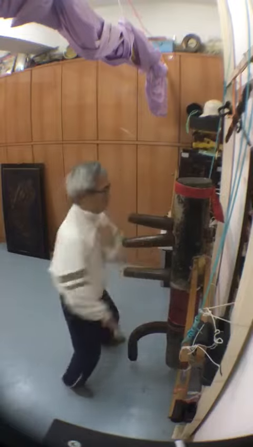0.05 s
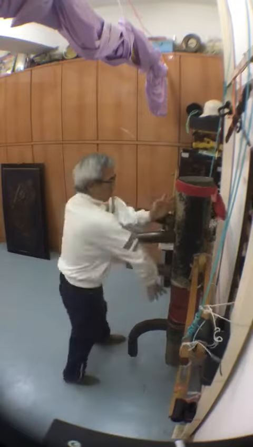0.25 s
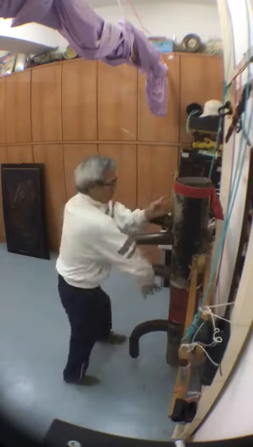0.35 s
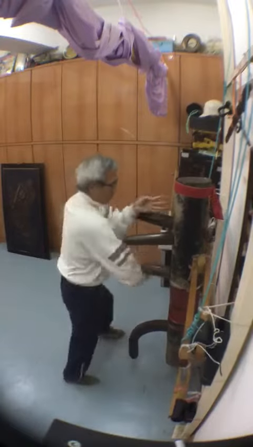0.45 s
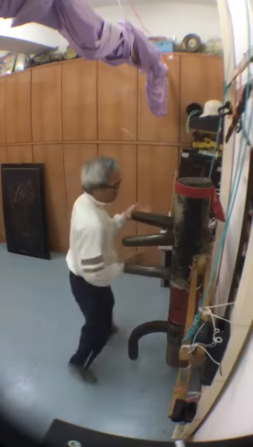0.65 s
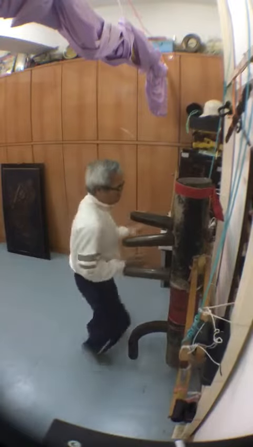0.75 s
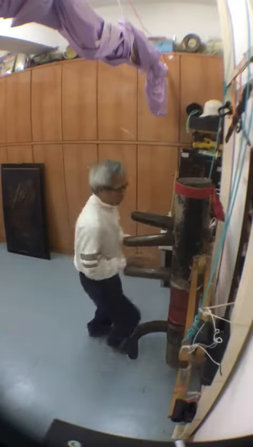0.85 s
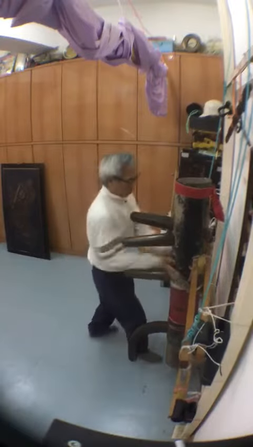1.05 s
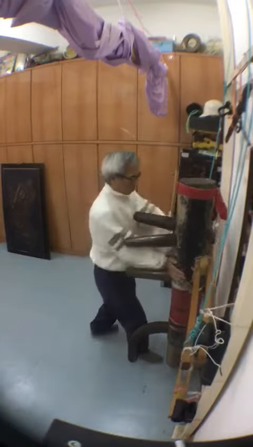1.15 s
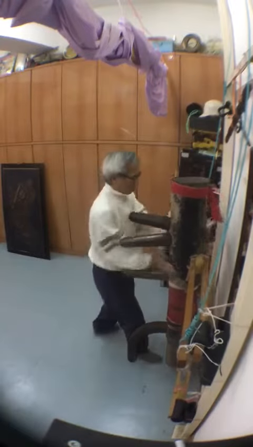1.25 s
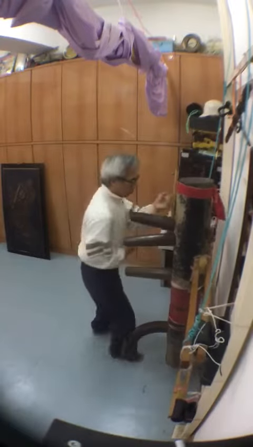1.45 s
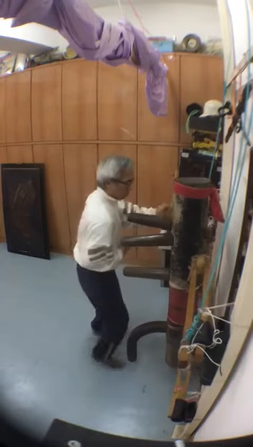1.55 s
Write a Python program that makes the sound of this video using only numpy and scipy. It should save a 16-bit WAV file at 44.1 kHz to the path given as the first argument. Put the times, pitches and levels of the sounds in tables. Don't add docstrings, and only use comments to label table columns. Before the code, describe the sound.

Wooden training dummy hit hard once, then smaller knocks and a loose leg clack, echoing indoors

```python
import sys
import numpy as np
from scipy import signal
from scipy.fft import rfft, irfft, next_fast_len
from scipy.io import wavfile
from scipy.ndimage import map_coordinates

SR = 44100
rng = np.random.default_rng(int(sys.argv[2]) if len(sys.argv) > 2 else 0)


def volts_from_db(level):
    exponent = np.asarray(level, float) / 20
    return 10 ** exponent


def digitize_waveform(pressure):
    field = np.atleast_2d(pressure).T
    bounded = np.clip(field, -1, 1)
    quanta = np.round(bounded * 32767).astype(np.int16)
    wavfile.write(sys.argv[1], SR, quanta)


N = 70560


def unit(x):
    return x / np.sqrt(np.mean(x ** 2) + 1e-20)


def along(points, hz):
    f, v = np.transpose(points)
    return np.interp(np.log(hz + 1), np.log(f + 1), v)


def coloured(x, gain):
    m = 2 * next_fast_len(len(x) // 2 + SR // 4)
    cepstrum = irfft(np.log(gain(np.fft.rfftfreq(m, 1 / SR)) + 1e-6), m)
    cepstrum[1:m // 2] *= 2
    cepstrum[m // 2 + 1:] = 0
    return irfft(rfft(x, m) * np.exp(rfft(cepstrum)), m)[:len(x)]


def bell(hz, centre_hz, width_hz):
    return 1 / np.sqrt(1 + (2 * (hz - centre_hz) / width_hz) ** 2)


def wobble(rate):
    knots = rng.standard_normal(int(N * rate / SR) + 4)
    return map_coordinates(knots, [np.arange(N) * rate / SR])


# frequency in Hz, level in dB.
AIR_TONE = [(59, -76), (100, -27), (189, -8), (438, -11), (1030, -14.5), (1120, -16), (1290, -18.5),
            (5430, -56.5), (11800, -53), (15400, -138), (22000, -120)]
# frequency in Hz, width in Hz, level in dB.
HUM_MODES = [(41.67, 3.3, -47.5), (69.9, 18, -47.5), (90.6, 10, -61.5), (125.8, 11.5, -55.5),
             (187, 60, -58)]
AIR_DB = -52


def air():
    tone = [(60, -14)] + AIR_TONE
    hiss = unit(coloured(rng.standard_normal(N), lambda hz: volts_from_db(along(tone, hz))))
    hum = np.zeros(N)
    for centre_hz, width_hz, db in HUM_MODES:
        mode = coloured(rng.standard_normal(N), lambda hz: bell(hz, centre_hz, width_hz) ** 2)
        hum += volts_from_db(db) * unit(mode)
    return volts_from_db(AIR_DB - 1.5 + 0.4 * wobble(4.9)) * hiss + hum


# time in seconds, level in dB.
SLEEVE_MOVES = [(0, -51), (0.033, -43.5), (0.068, -41.5), (0.129, -47), (.17, -52.5), (0.209, -43),
                (.45, -63.5), (.62, -41.5), (.69, -42.5), (.8, -48.5), (0.858, -52), (0.958, -58),
                (1.028, -47), (1.122, -48), (1.3, -47), (1.38, -45), (1.5, -47), (1.6, -44)]
# frequency in Hz, level in dB.
CLOTH_TONE = [(600, -58), (1500, -7.5), (2300, -7.5), (2900, -7.5), (4000, -7.5), (5400, -0.5), (6800, -12),
              (8000, -25)]
CLOTH_DB, RUBS_PER_S, RUB_SHARE = -2, 900, .3


def sleeves():
    s, db = np.transpose(SLEEVE_MOVES)
    rubs = (rng.random(N) < RUBS_PER_S / SR) * rng.standard_normal(N)
    friction = rng.standard_normal(N) + RUB_SHARE * unit(rubs)
    tone = CLOTH_TONE + [(12000, -33)]
    hiss = unit(coloured(friction, lambda hz: volts_from_db(along(tone, hz))))
    movement_db = np.interp(np.arange(N) / SR, s, db)
    return hiss * volts_from_db(CLOTH_DB + movement_db + wobble(17))


# start in seconds, level in dB, rise in seconds, 60 dB decay in seconds.
FOOTFALLS = [(0, -44, 0.011, 0.53), (0.058, -30.5, 0.013, 0.19), (.3, -44.5, .03, 1),
             (0.498, -41.5, 0.033, .5), (.68, -28.5, .015, 0.44), (0.726, -32, 0.01, 0.11),
             (1.162, -36, 0.01, 0.21), (1.258, -41.5, .02, .25), (1.389, -45.5, 0.01, .25)]
# frequency in Hz, level in dB.
FLOOR_BOARDS = [(68, -1), (91, 7.5), (185, -12.5)]


def steps():
    out, t = np.zeros(N + SR), np.arange(SR) / SR
    boom = sum(volts_from_db(level) * np.sin(2 * np.pi * hz * t) for hz, level in FLOOR_BOARDS)
    for s, db, rise, t60 in FOOTFALLS:
        swell = 1 - np.exp(-(t / rise) ** 2)
        out[round(s * SR):][:SR] += volts_from_db(db - 60 * t / t60) * swell * boom
    return out[:N]


# delay in seconds, level in dB.
WALL_ECHOES = [(.0035, -14), (.0078, -1.5), (.0128, -2.5), (.017, -11), (.022, -6), (.029, -9)]
# frequency in Hz, 60 dB decay in seconds.
ROOM_DECAY = [(150, 0.95), (300, 0.69), (1000, 0.96), (2500, 0.91), (5500, 0.76), (10000, 0.98)]
BUILD_S, EARLY_DB, EARLY_T60_S = .017, 4, .25


def room(x, wet_db):
    hz, t, z = signal.stft(rng.standard_normal(SR * 9 // 8), SR, nperseg=256)
    decay = volts_from_db(-60 * t / along(ROOM_DECAY, hz)[:, None])
    tail = signal.istft(z * decay, SR, nperseg=256)[1]
    t = np.arange(len(tail)) / SR
    build = 1 - np.exp(-(t / BUILD_S) ** 2)
    early = 1 + volts_from_db(EARLY_DB - 60 * t / EARLY_T60_S)
    tail = tail * build * early
    answer = volts_from_db(wet_db) * tail / np.linalg.norm(tail)
    answer[0] += 1
    for s, db in WALL_ECHOES:
        answer[round(s * SR)] += volts_from_db(db)
    return signal.fftconvolve(x, answer)


SLAP_DB, MODE_RISE_S = 18, 0.0012


def ringing(modes, t):
    ring = np.zeros(len(t))
    for f, level, t60 in modes:
        level_shift = 1.5 * rng.standard_normal()
        detune = .01 * rng.standard_normal()
        ring += volts_from_db(level + level_shift - 60 * t / t60) * np.sin(2 * np.pi * f * (1 + detune) * t)
    return ring * (1 - np.exp(-t / MODE_RISE_S)) / 2


def contact_slap(skin, smear_ms, t):
    hz = np.fft.rfftfreq(len(t), 1 / SR)
    late_s = smear_ms / 1000 * np.interp(hz, np.linspace(0, SR / 2, 60), rng.random(60))
    phase = 2 * np.pi * np.cumsum(late_s) * hz[1]
    click = irfft(np.exp(-1j * phase), len(t)) * (t < .05)
    return coloured(click, lambda f: volts_from_db(along(skin, f)))


def knocks(hits, modes, skin, smear_ms, wet_db):
    out, t = np.zeros(N + 3 * SR), np.arange(SR // 4) / SR
    for s, db, hard in hits:
        ring = ringing(modes, t)
        slap = contact_slap(skin, smear_ms, t)
        hard = np.clip(hard, 0, 1)
        knock = (1 - hard) * ring + hard * volts_from_db(SLAP_DB) * slap
        wet = room(volts_from_db(db) * knock, wet_db)
        out[round(s * SR):][:len(wet)] += wet
    return out[:N]


# start in seconds, level in dB, hardness from 0 to 1.
SHOE_KNOCKS = [
    (.655, -38.5, 0.13),
    (.75, -45, .05),
]
# frequency in Hz, level in dB, 60 dB decay in seconds.
SOLE_MODES = [(231, 5, 0.027), (325, 3, 0.023), (466, 0, 0.021), (690, 1.5, 0.022)]


def shoes():
    return knocks(SHOE_KNOCKS, SOLE_MODES, SOCKET_TONE, smear_ms=6, wet_db=7)


# start in seconds, level in dB, hardness from 0 to 1.
LEG_CLACKS = [
    (1.3965, -51, 0.2),
    (1.4075, -25, 0.62),
    (1.428, -32.5, .1),
    (1.454, -48, 0.75),
]
LEG_REBOUNDS = [
    (1.463, -32.5, 0.079),
    (1.4766, -35.5, 0.15),
    (1.51, -40, 0.12),
]
# frequency in Hz, level in dB, 60 dB decay in seconds.
LEG_MODES = [(280, -10, 0.043), (425, -11.5, 0.034), (738, 7.5, 0.01), (893.6, 3.5, 0.062),
             (1949, -4, 0.065), (2206, 2, 0.042), (2430, -7, 0.037), (3050, 0.5, 0.014), (3400, -9, .02),
             (4500, -26, 0.0047)]
REBOUND_MODES = [(504, -4.5, 0.022), (867, -9, 0.052), (1017, -0.5, 0.034), (1920, -5, 0.057),
                 (2154, -9.5, 0.06), (2430, -6, 0.026)]
# frequency in Hz, level in dB.
SOCKET_TONE = [(200, -9), (600, 2.5), (2000, -5.5), (4000, -2.5), (5000, -0.5), (6000, -20), (8000, -17),
               (12000, -10)]


def leg():
    clacks = knocks(LEG_CLACKS, LEG_MODES, SOCKET_TONE, smear_ms=1.8, wet_db=1)
    rebounds = knocks(LEG_REBOUNDS, REBOUND_MODES, SOCKET_TONE, smear_ms=1.8, wet_db=1)
    return clacks + rebounds


# start in seconds, level in dB, hardness from 0 to 1.
ARM_KNOCKS = [(.039, -49, 0.33), (.044, -51, 0.67), (.058, -59.5, 0.46), (.61, -73, 0.8), (.665, -40, 0.59),
              (.814, -60, 0.23), (.871, -56, 1), (1.1235, -62.5, .6), (1.128, -38, 0.71), (1.136, -25, 0.6),
              (1.169, -38.5, 0.058), (1.2192, -39, 0.052)]
# frequency in Hz, level in dB, 60 dB decay in seconds.
ARM_MODES = [(191, -2, 0.069), (283, 0, 0.048), (603, 3, 0.041), (739.4, 14, 0.015), (906, 10, 0.019),
             (1010, 3.5, 0.022), (1256, -1, .03), (1590, -3.5, 0.025), (2290, -10.5, 0.056)]
# frequency in Hz, level in dB.
FOREARM_TONE = [(200, -17), (600, -24), (2000, 0.5), (4000, 3), (5200, 6), (6500, -4.5), (9000, -1),
                (12000, 1.5)]


def arm():
    return knocks(ARM_KNOCKS, ARM_MODES, FOREARM_TONE, smear_ms=2.2, wet_db=3.5)


# start in seconds, level in dB, hardness from 0 to 1.
TRUNK_BLOWS = [
    (.217, -45, 0.06),
    (.2275, -23, 0.18),
    (.236, -9, 0.52),
    (.248, -21.5, 0.96),
    (.33, -25, .3),
]
# frequency in Hz, level in dB, 60 dB decay in seconds.
TRUNK_MODES = [(247, -10, 0.056), (282.4, -9.5, 0.084), (426.5, -19.5, 0.069), (607, 1, 0.02),
               (723, 13, 0.017), (821.5, 2.5, 0.027), (1134, 0, .025), (1252, 13, 0.013), (1453, 8, 0.015),
               (1640, -1, 0.023), (1957, 2, 0.018), (2414, -10.5, 0.033), (3500, -31, .008)]
# frequency in Hz, level in dB.
PALM_TONE = [(200, -16), (600, 12), (2000, -1), (4400, -3), (5450, -1), (6200, -7.5), (7000, -1.5),
             (8200, -11)]


def trunk():
    return knocks(TRUNK_BLOWS, TRUNK_MODES, PALM_TONE, smear_ms=6, wet_db=7)


# frequency in Hz, level in dB.
MIC_TONE = [(30, -15), (45, 11.5), (6900, 11), (7800, 1.5), (10000, -6.5), (11900, -26)]


def mic(hz):
    peak = 1 + 1.1 * bell(hz, 5400, 550) ** 2
    dip = np.abs(1 - .45 * bell(hz, 2850, 500) ** 2)
    return volts_from_db(along(MIC_TONE, hz)) * peak * dip


def scene():
    dummy = trunk() + arm() + leg() + shoes()
    return (coloured(dummy, mic) + steps() + sleeves() + air())[None]


def overload(x):
    ceiling, knee = 1.02, 5
    return x / (1 + np.abs(x / ceiling) ** knee) ** (1 / knee)


def band_limit(x):
    hz, t, z = signal.stft(x, SR, nperseg=1024)
    sunk = (t > .325) & (t < .5)
    top_hz = np.where(sunk, 7750, 11980)
    return signal.istft(z * (hz[:, None] < top_hz), SR, nperseg=1024)[1][:, :N]


def roll_off(x):
    return signal.sosfilt(signal.butter(12, 11980, fs=SR, output="sos"), x)


def record(dry):
    mix = band_limit(overload(dry))
    return roll_off(mix)


dry = scene()
out = record(dry)
digitize_waveform(out)
```